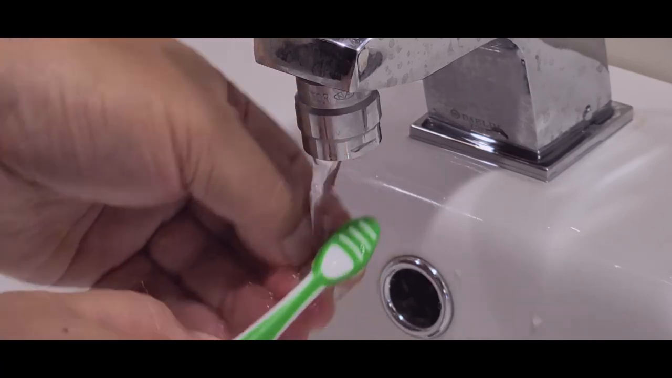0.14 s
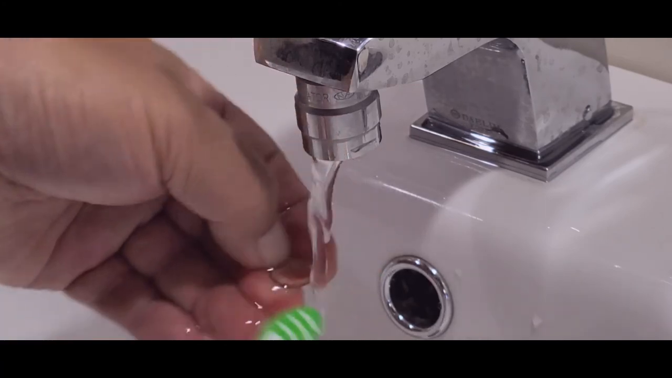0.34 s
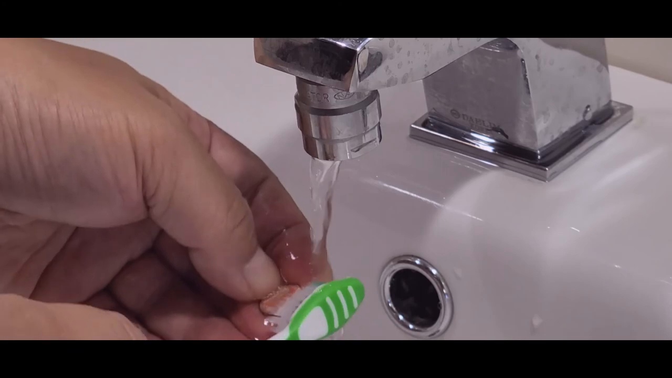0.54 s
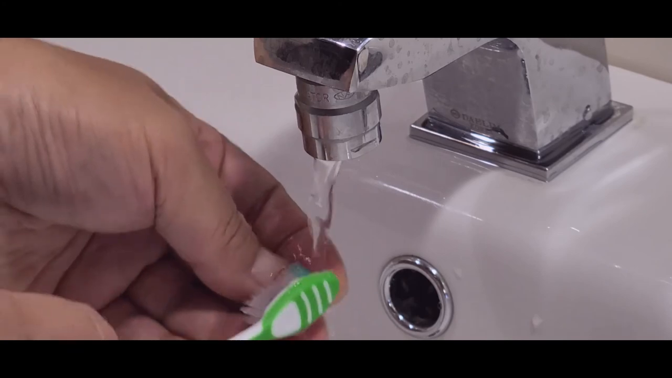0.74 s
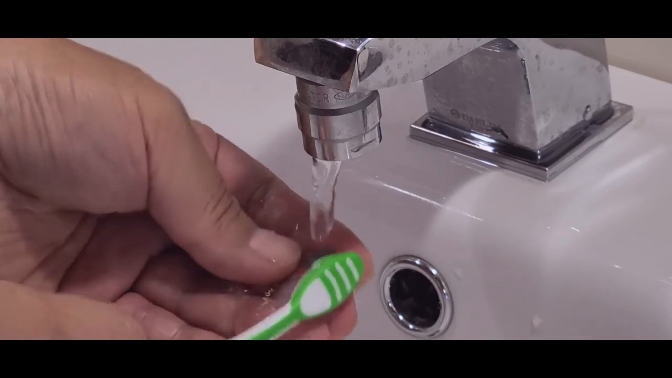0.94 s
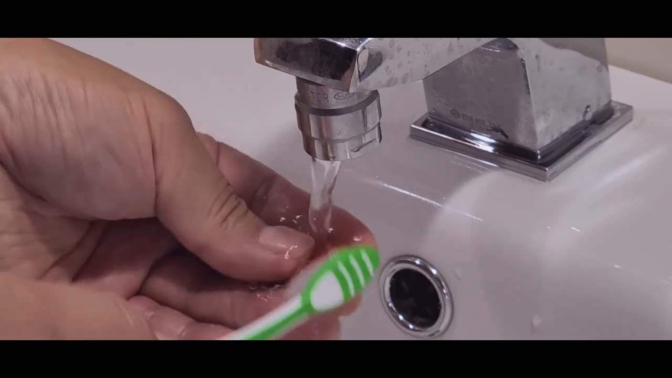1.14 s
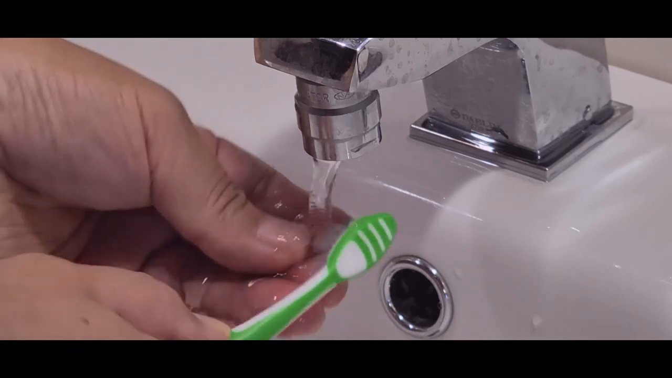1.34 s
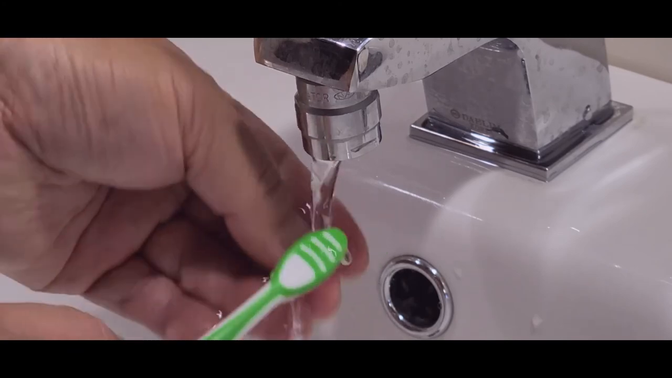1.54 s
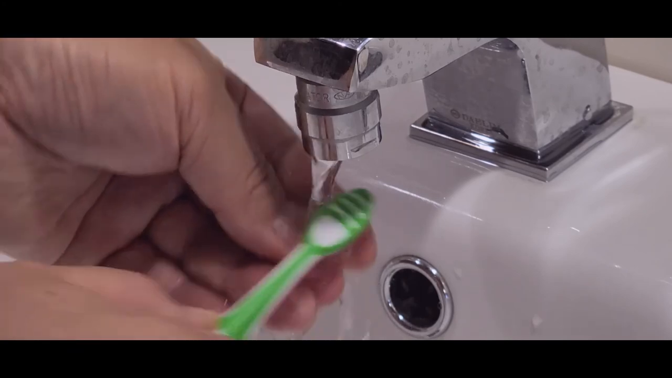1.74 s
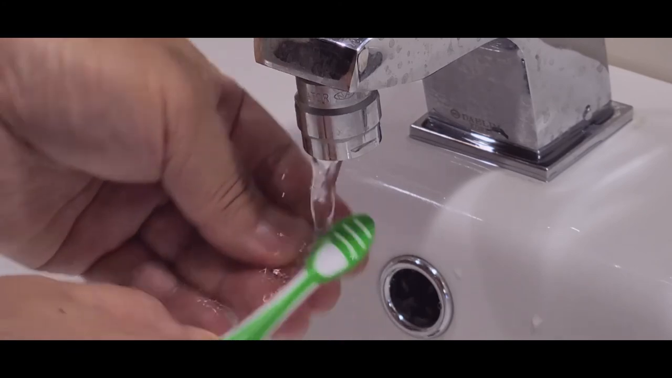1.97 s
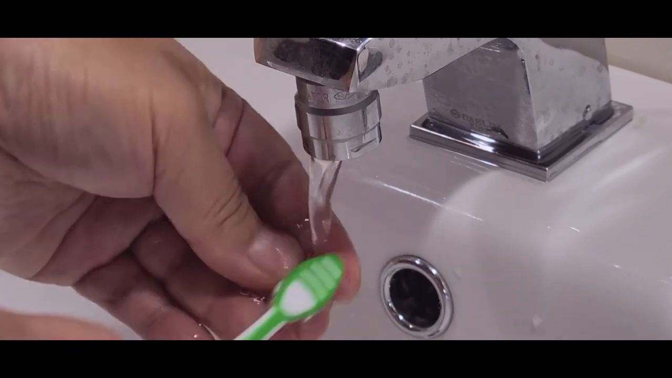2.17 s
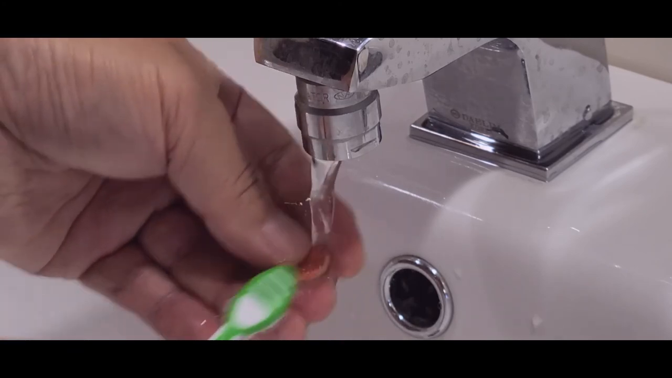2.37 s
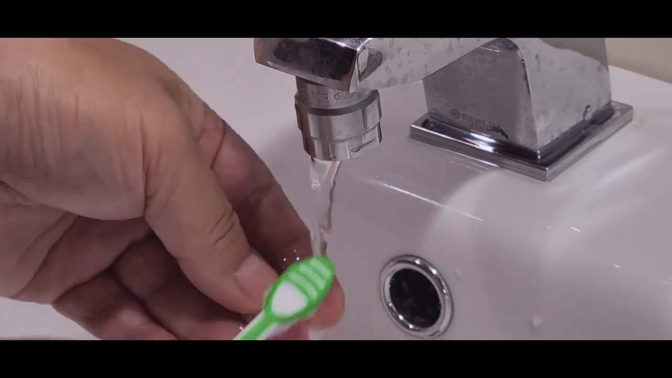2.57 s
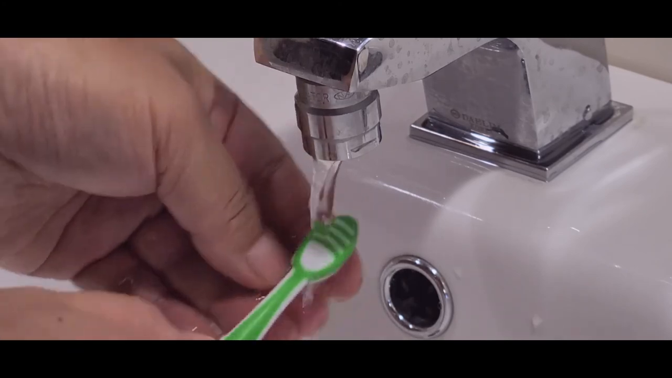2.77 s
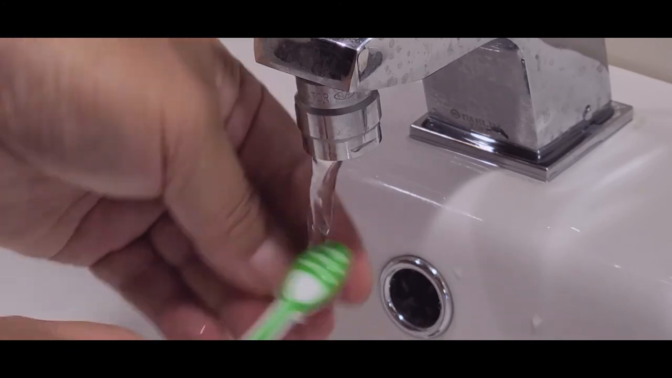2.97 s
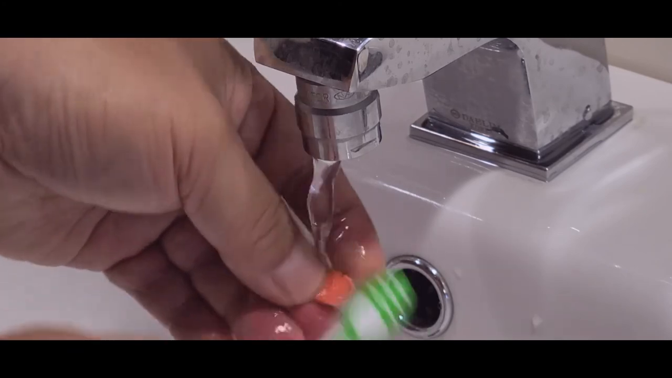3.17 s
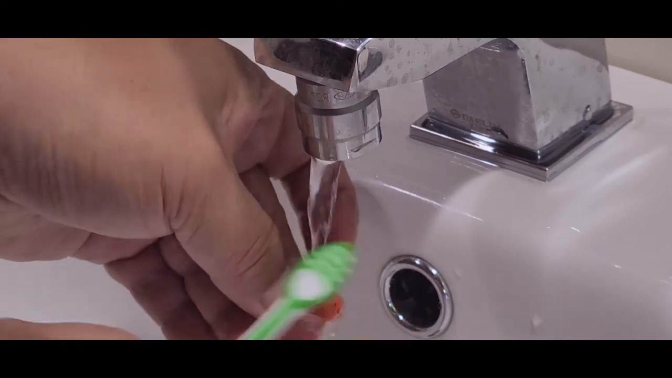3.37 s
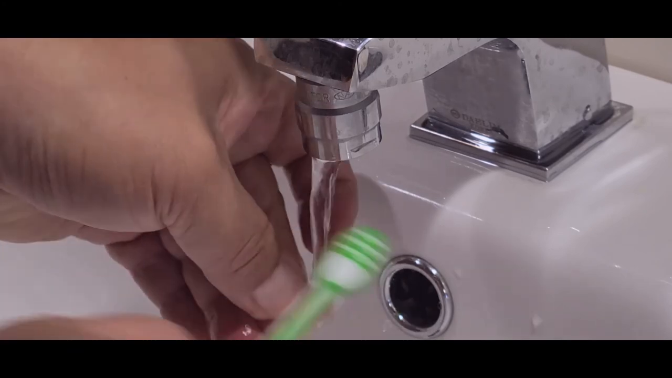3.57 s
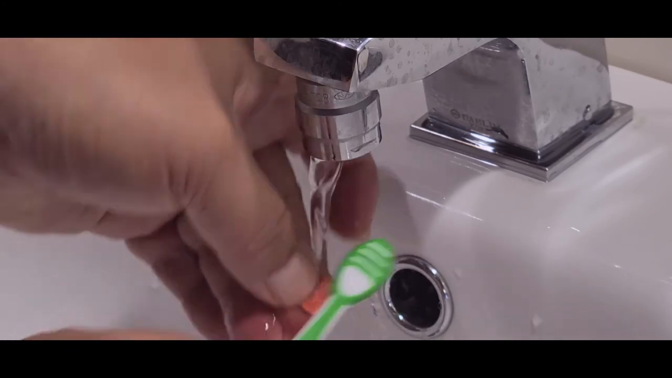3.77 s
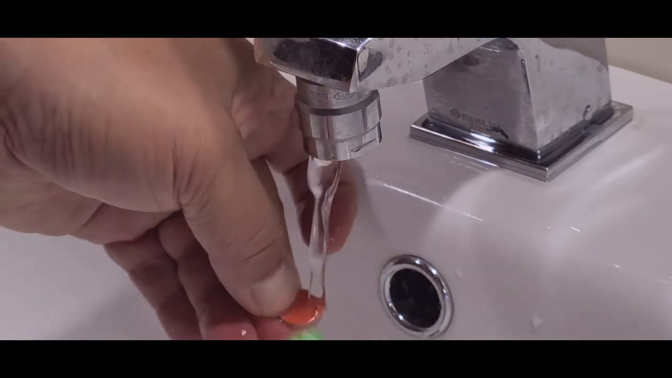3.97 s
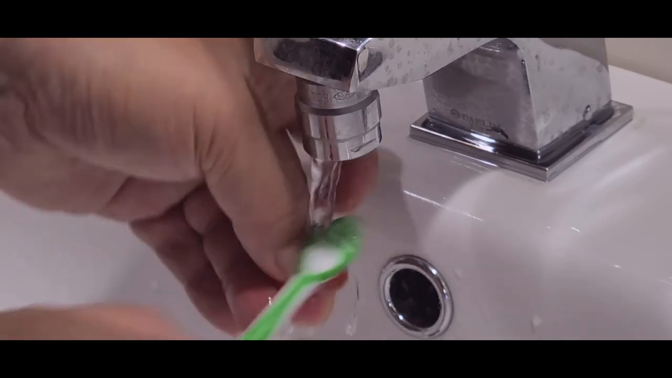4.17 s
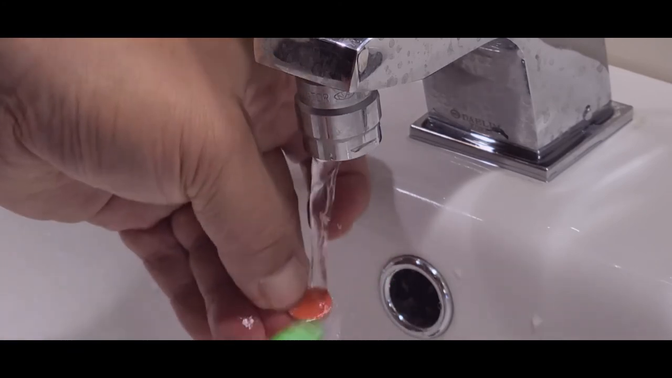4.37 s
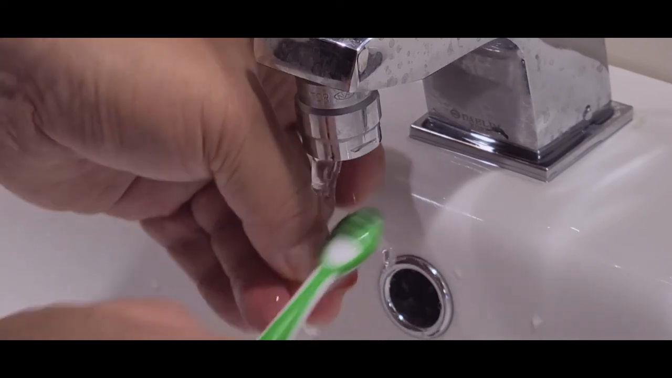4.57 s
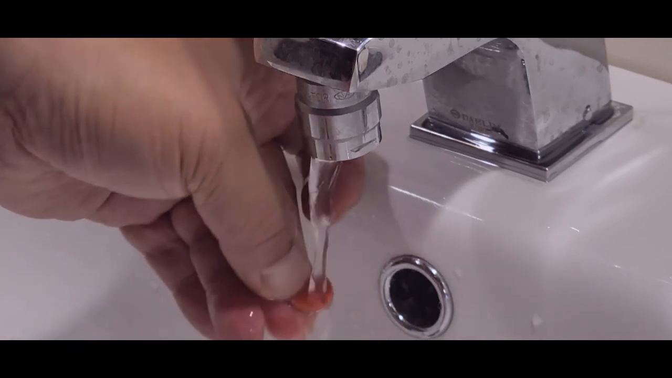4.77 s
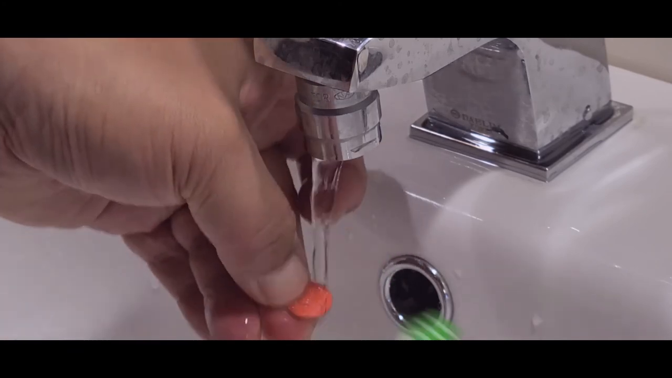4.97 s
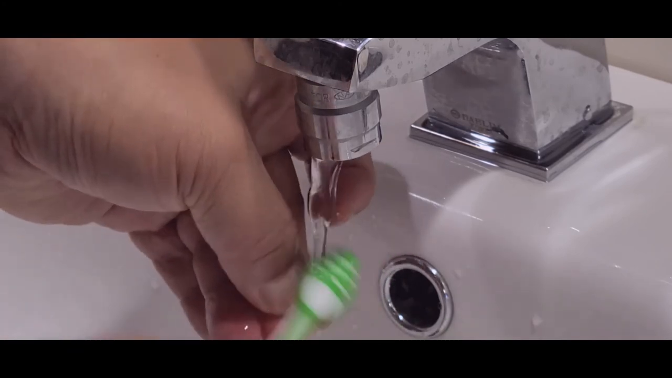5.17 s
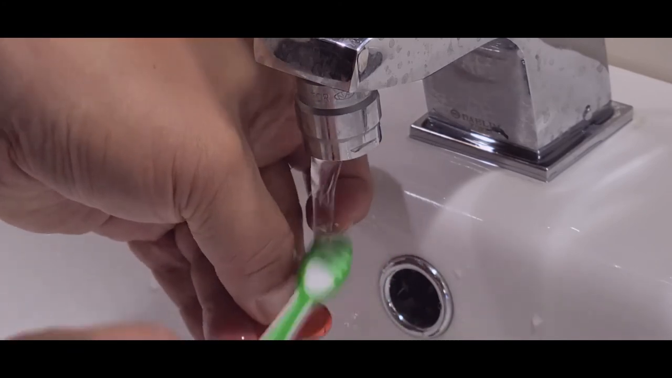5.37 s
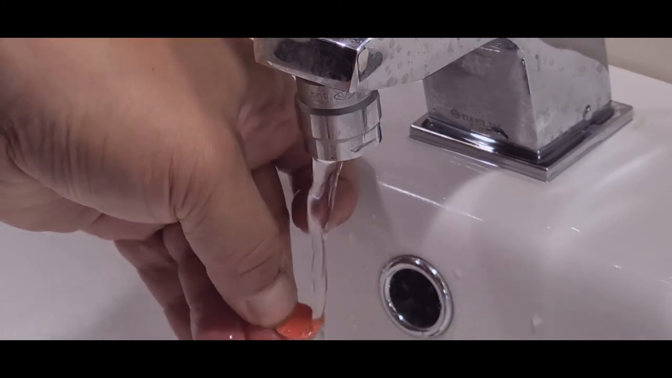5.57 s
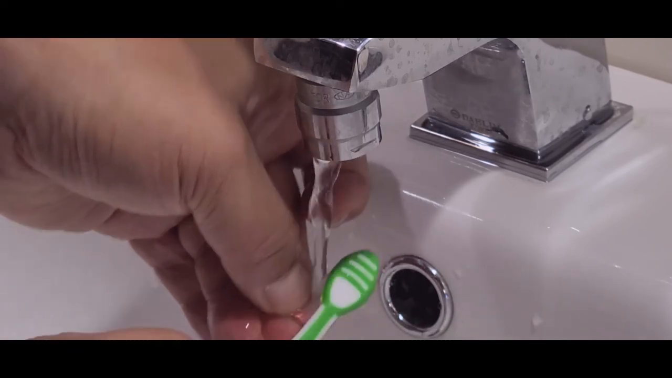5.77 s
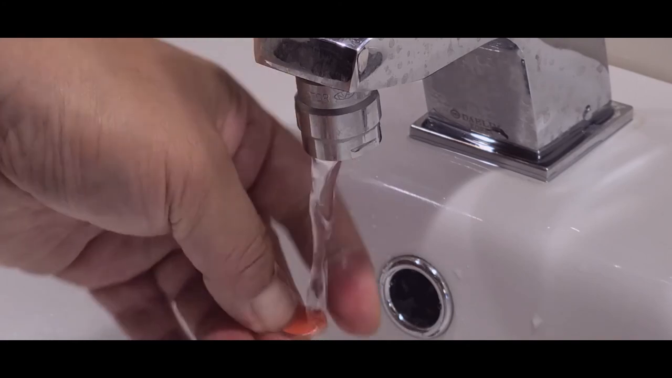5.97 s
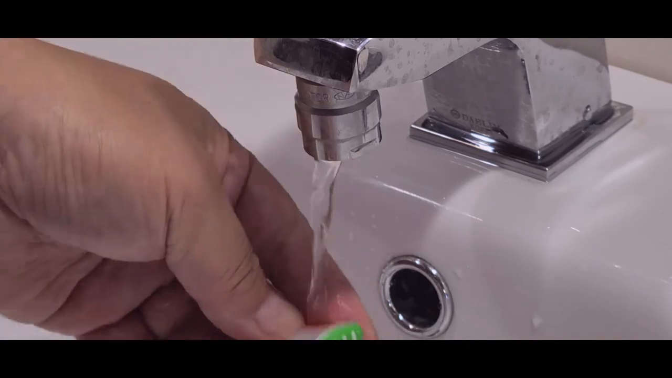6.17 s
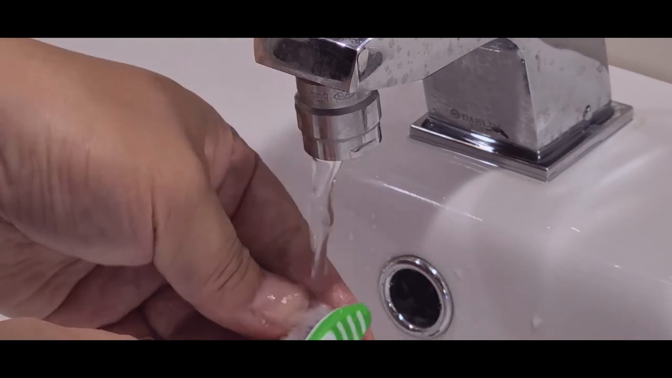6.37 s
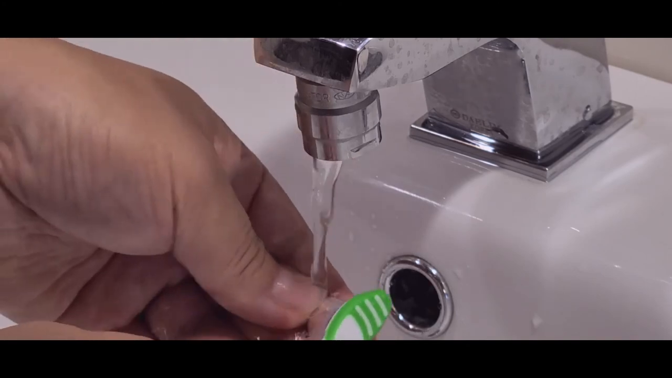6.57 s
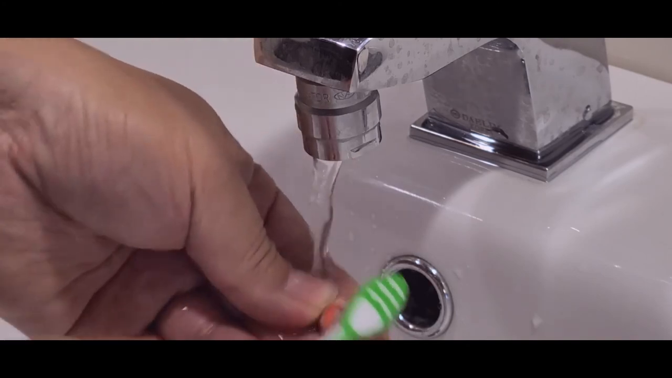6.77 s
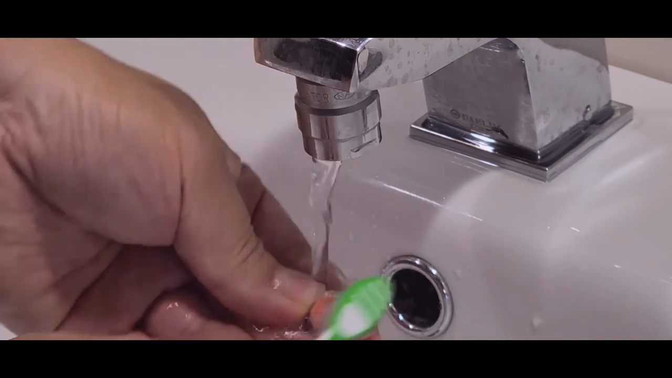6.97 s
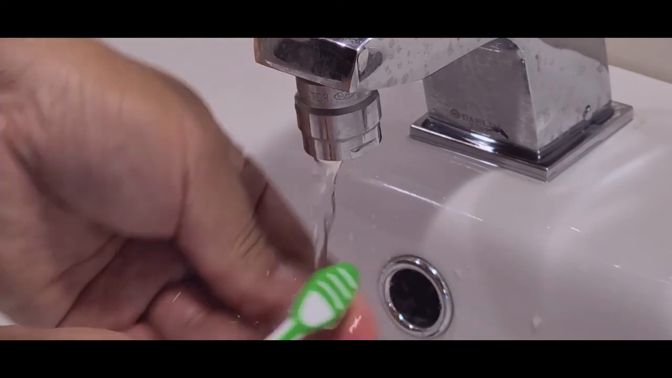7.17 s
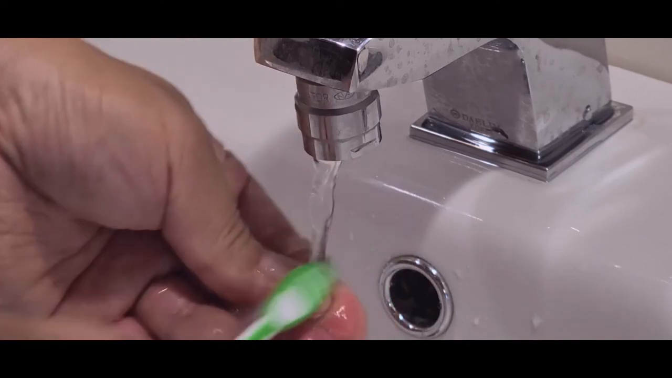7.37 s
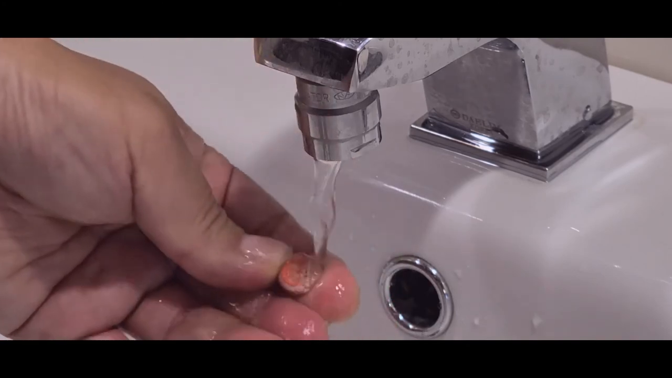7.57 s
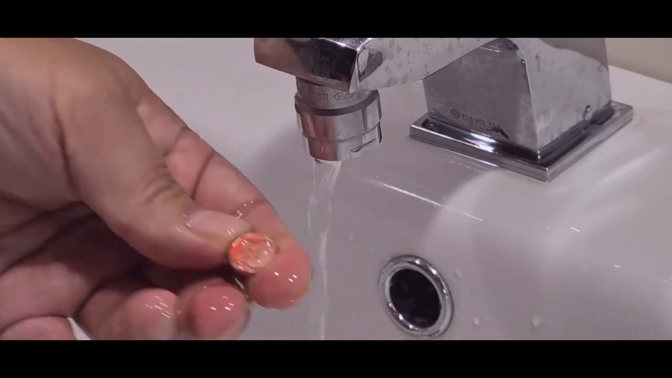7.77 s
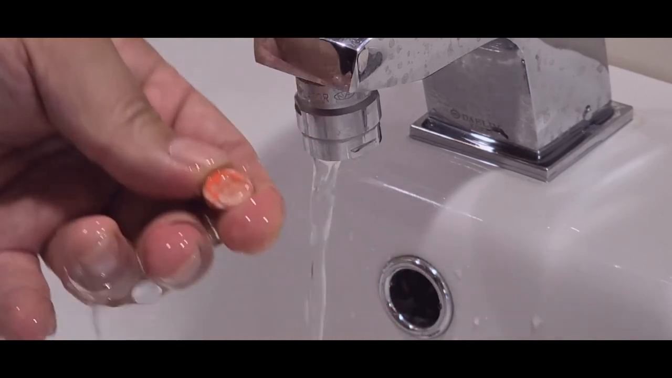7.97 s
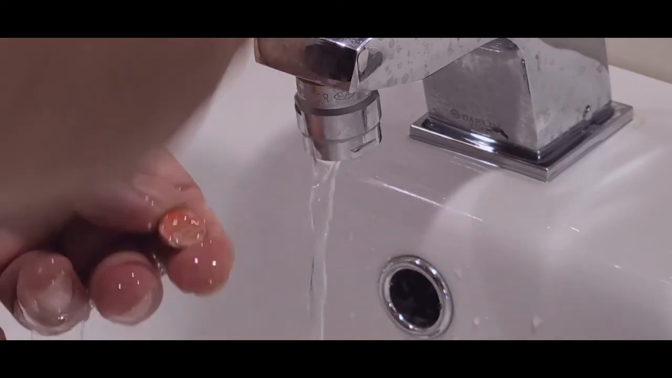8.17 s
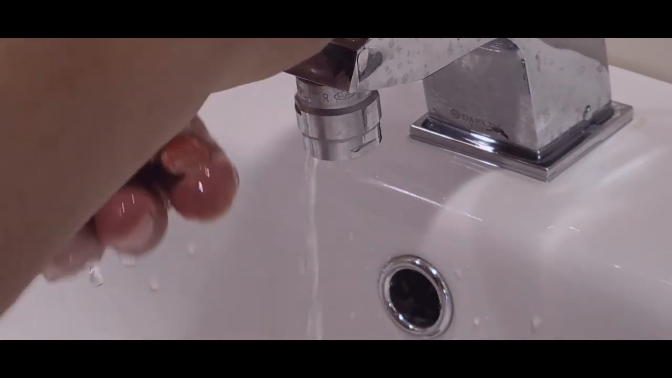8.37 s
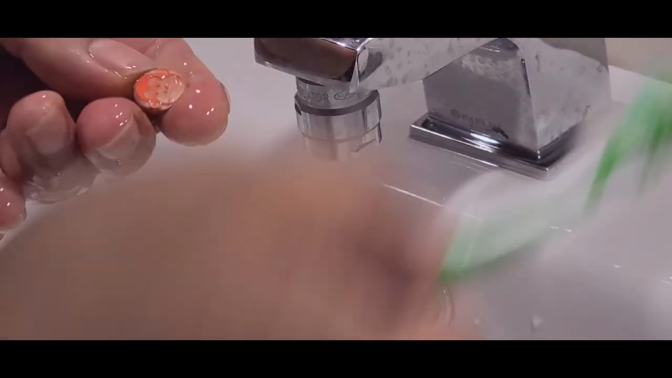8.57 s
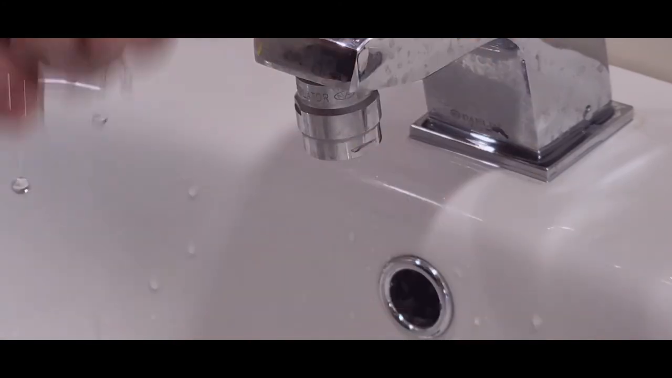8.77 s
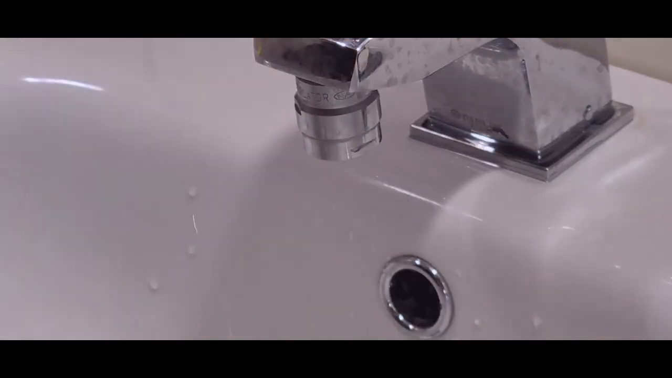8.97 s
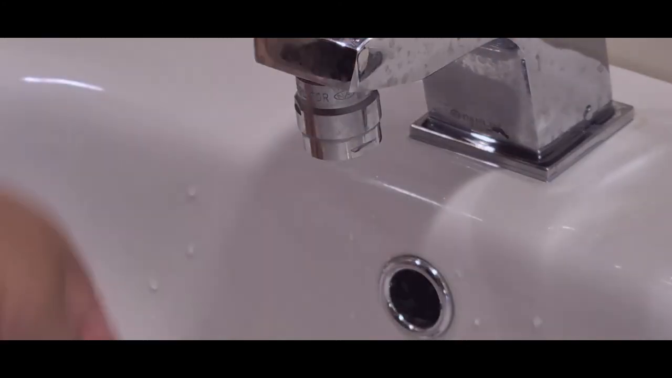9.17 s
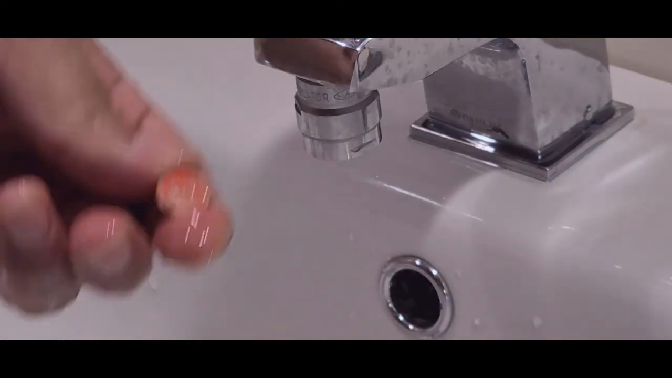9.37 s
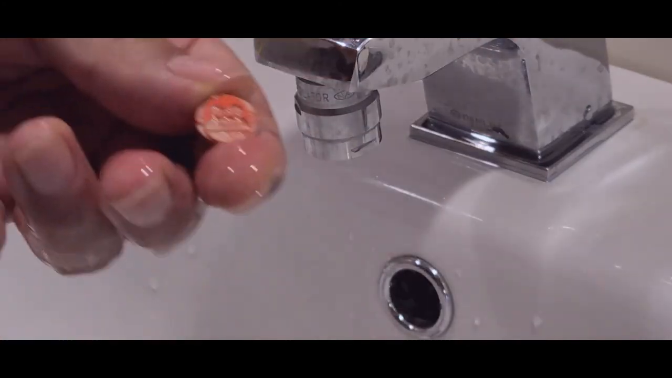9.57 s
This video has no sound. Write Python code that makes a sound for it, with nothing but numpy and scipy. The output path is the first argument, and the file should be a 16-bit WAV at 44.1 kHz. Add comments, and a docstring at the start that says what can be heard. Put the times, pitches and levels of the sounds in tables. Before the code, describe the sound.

Close-up at a bathroom sink: a thin tap stream hisses and trickles over wet fingers into a ceramic basin. A toothbrush scrubs a small object in brief, fizzy bristle strokes, with sharp watery pops and ticking drops. After about eight seconds the lever clacks shut with a dull thump, the water quickly dies away, and only a faint low room rush remains.

```python
"""A toothbrush scrubs a small object under a thin stream from a tap, over a ceramic basin in a small tiled room.
The bristles fizz as bursts of tiny noise snaps; flicked drops tick; air pockets between wet fingers pop as rising rings.
The stream is fluttering noise, water off the fingers is many tiny rings and ticks, and the drain gulps now and then.
The lever is pushed shut with a click and a thump, the water fades and the room's low rush remains."""
import sys
import numpy as np
from scipy import signal
from scipy.fft import rfft, irfft, next_fast_len
from scipy.io import wavfile
from scipy.ndimage import uniform_filter1d

SR = 44100
rng = np.random.default_rng(int(sys.argv[2]) if len(sys.argv) > 2 else 0)


def to_wav(s):
    """Save 16-bit WAV."""
    ch = np.atleast_2d(s).T  # columns
    pcm = np.round(np.clip(ch, -1, 1) * 32767)  # PCM
    wavfile.write(sys.argv[1], SR, pcm.astype(np.int16))


N = 424235
TIME = np.arange(N) / SR

# air pockets popping: start_s, level_db (before the shared gain), pitch_hz, violence (1 is usual, less rings purer)
AIR_POCKETS = [(0.1837, -18, 4830, 0.48), (0.564, -25.5, 6450, 1.07), (1.184, -33, 2880, 0.81),
               (1.374, -16, 5660, 1.15), (1.5423, -7.5, 4500, 1.68), (1.653, -28.5, 6900, 2.5),
               (1.835, -26, 5040, .8), (1.865, -32, 2940, 1.03), (1.9354, -18.5, 4100, 1.12),
               (1.9379, -14.5, 4900, 2.9), (2.258, -38.5, 4700, 0.41), (2.3842, -32.5, 3080, 0.46),
               (2.5749, -17.5, 5900, 0.71), (2.845, -39, 5150, 2.04), (3.340, -22.5, 5580, 1.07),
               (3.351, -26.5, 3970, 0.95), (3.493, -28.5, 5460, 0.55), (3.7291, -21, 4920, 0.43),
               (4.002, -26, 6030, 2.2), (4.01, -34, 4830, 1.9), (5.599, -34.5, 5130, 2.5),
               (5.6327, -21.5, 7140, 0.59), (5.758, -31.5, 5770, 1), (5.9962, -27, 5070, 1.28),
               (6.960, -22.5, 9900, 1.16), (7.086, -28.5, 4000, 2.15), (7.483, -37, 4370, .7),
               (7.535, -23.5, 7250, 1.26), (7.631, -24.5, 5900, 0.77), (7.8587, -24.5, 6150, 1.26),
               (7.954, -26.5, 8760, 0.89), (8.003, -34.5, 3990, 0.53), (8.1019, -25.5, 3100, 1.7),
               (8.1045, -13.5, 5600, 1.2)]
# flicked drops striking the basin: start_s, level_db (before the shared gain)
FLICKED_DROPS = [(0.295, -18), (0.423, -25), (0.4524, -28.5), (0.5356, -27.5), (0.692, -54), (1.9694, -28),
                 (2.063, -24), (2.09, -30.5), (2.3385, -30.5), (2.4196, -35.5), (3.504, -29),
                 (3.8064, -21.5), (3.878, -33), (5.7783, -24.5), (5.854, -21.5), (6.061, -35.5),
                 (7.187, -26), (7.352, -23), (7.8074, -20), (8.0887, -21.5)]
# blows of the closing lever: start_s, click_db, thump_db (before the thump and rattle gains), contact_s
LEVER_BLOWS = [(8.269, -29, -20.5, 0.015), (8.2816, -3.5, -46, 0.0088), (8.301, -15, -22, 0.0058),
               (8.3075, -35, -13, 0.003)]
# tone of a drop's splash: frequency_hz, relative level_db
DROP_TONE = [(1100, -40), (2200, -26.5), (3500, -8), (7000, 3), (12000, 5), (16000, -4.5)]
# strength of the water flow: time_s, level_db
WATER_FLOW = [(0, -2.5), (8.25, -1.1), (8.4, 1), (8.6, -22), (9.62, -41)]


def amp(db):
    """Turns decibels into a gain."""
    return 10 ** (np.asarray(db) / 20)


def unit(x):
    """Scales a sound to an average strength (rms) of 1."""
    return x / np.sqrt(np.mean(x ** 2) + 1e-20)


def read(points, hz):
    """Reads a table between its points, on a log-frequency axis."""
    f, value = np.transpose(points)
    return np.interp(np.log(hz + 1), np.log(f + 1), value)


def level(curve):
    """Turns a decibel curve over time into a gain for every sample."""
    return amp(np.interp(TIME, *np.transpose(curve)))


def add(mix, s, sound):
    """Mixes a sound in at time s, in seconds."""
    part = mix[:, max(round(s * SR), 0):][:, :sound.shape[-1]]
    part += sound[..., :part.shape[1]]


def place(sound, pan_db, lag):
    """Places a sound by a left-right level difference at equal total power and a delay in samples."""
    ratio = amp(np.clip(pan_db, -7, 7))
    left, right = unit(np.array([ratio, 1]))
    return np.array([left * np.roll(sound, max(lag, 0)), right * np.roll(sound, max(-lag, 0))])


def band(x, low_hz, high_hz, order=4):
    """Keeps the range between two frequencies; nothing sounds ahead of its cause."""
    sos = signal.butter(order, [low_hz, min(high_hz, SR / 2 - 1)], "band", fs=SR, output="sos")
    return signal.sosfilt(sos, x)


def colour(x, spectrum, size=2048):
    """Gives a sound the shape of a spectrum, using a filter of energy 1 that never sounds early."""
    hz = abs(np.fft.fftfreq(size, 1 / SR))
    log_gain = np.log(amp(np.maximum(read(spectrum, hz), -100)))
    # this phase packs the energy as early as possible
    taps = np.fft.ifft(np.exp(np.conj(signal.hilbert(log_gain)))).real[:size // 2]
    return signal.oaconvolve(x, taps[None] / np.linalg.norm(taps), axes=1)[:, :x.shape[1]]


def diffuse(gain):
    """Makes steady noise of spectrum gain(Hz), nearly the same left and right in the bass."""
    # left-right likeness: frequency_hz, likeness (0-1)
    likeness = [(80, 0.87), (300, 0.71), (700, 0.32), (2000, 0)]
    size = next_fast_len(N)
    hz = np.fft.rfftfreq(size, 1 / SR)
    a, b = rfft(rng.standard_normal((2, size)))
    alike = np.clip(read(likeness, hz), 0, 1)
    sides = np.array([a, alike * a + np.sqrt(1 - alike ** 2) * b])
    return unit(irfft(sides * gain(hz), size)[:, :N])


def room(x, wet_db, early_db, count=8):
    """Adds a few quick reflections off the basin and the fading tail of the tiled room to the direct sound."""
    # time for the tail to fall by 60 dB: frequency_hz, fade_s
    room_fade = [(200, 0.27), (1400, 0.32), (4000, 0.23), (9000, 0.2), (15000, 0.2)]
    taps = rng.choice([-1., 1.], (2, SR // 2)) * (rng.random((2, SR // 2)) < .15)  # sparse echoes
    taps *= np.clip(TIME[:SR // 2] / 0.0028 - .5, 0, 1)  # the tail starts just after the direct sound
    hz, t, z = signal.stft(taps, SR, nperseg=256)
    fade = amp(-60 * t / read(room_fade, hz)[:, None])
    tail = signal.istft(z * fade, SR, nperseg=256)[1]
    response = amp(wet_db) * tail / np.linalg.norm(tail[0])
    for side in response:
        delays = (rng.uniform(.0012, .014, count) * SR).astype(int)
        side[delays] += amp(early_db) * rng.choice([-1, 1], count) / np.sqrt(count)
    response[:, 0] += 1  # direct sound
    return signal.oaconvolve(x, response, axes=1)[:, :N]


def bubble(hz, sweep_hz, swell_s, onset=1.9):
    """A pocket of air swells into a ring and fades; its pitch climbs by the sweep as it nears the surface."""
    u = np.arange(0, 18, 1 / (swell_s * SR))  # time in swells
    pitch = hz + sweep_hz * np.tanh((u - 1.15) * 0.59)
    swell = (u * np.exp(1 - u)) ** onset
    return swell * np.sin(2 * np.pi * (np.cumsum(pitch) / SR + rng.random()))


def splat(decay_s):
    """A tiny impact: a 4 ms burst of fading noise, rms 1."""
    t = TIME[:176]
    return unit(rng.standard_normal(len(t)) * np.exp(-t / decay_s))


def air(air_db=-58):
    """The room's low rush: steady noise, strongest in the bass."""
    # tone of the rush: frequency_hz, relative level_db
    air_tone = [(45, -10), (75, 1), (95, -7.5), (118, -23), (150, -11), (195, -17), (330, -12),
                (500, -19.5), (900, -20), (2200, -28), (5600, -35.5), (7000, -28.5), (8600, -40.5),
                (16000, -38.5)]
    return amp(air_db) * diffuse(lambda hz: amp(read(air_tone, hz)))


def rumble(s=4.94, db=-54, hz=27, width_hz=14, decay_s=0.48):
    """A soft, very low shudder: noise around one deep pitch that dies away."""
    since = np.maximum(TIME - s, 0)
    swell = np.minimum(since / .01, 1) * np.exp(-since / decay_s)
    return amp(db) * swell * diffuse(lambda f: 1 / (1 + ((f - hz) / width_hz) ** 2))


def drain(gain_db=-2, swell_s=0.011, rough=0.68, gurgle_db=-63, gurgle_hz=432, spread_hz=32, count=60):
    """Large, wobbling bubbles gulp in the waste pipe; fainter ones gurgle at random until the lever closes."""
    # the largest bubbles: start_s, level_db (before the shared gain), pitch_hz
    gulps = [(1.387, -52.5, 430), (1.839, -48, 432), (3.129, -53.5, 404.4), (8.053, -51, 438),
             (8.525, -48.5, 417)]
    out = np.zeros((2, N))
    gurgles = [(rng.uniform(0, LEVER_BLOWS[0][0]), gurgle_db, gurgle_hz + spread_hz * rng.standard_normal())
               for _ in range(count)]
    for s, db, hz in gulps + gurgles:
        add(out, s, amp(db + gain_db) * bubble(hz, 4.9, swell_s, onset=0.22))
    return out * (1 + rough * unit(uniform_filter1d(rng.standard_normal(N), 250)))


def hammer(s=8.298, db=-29.5, hz=91, swell_s=0.039):
    """The halted water shakes the supply pipe, which booms at one low pitch."""
    out = np.zeros((2, N))
    add(out, s, amp(db) * bubble(hz, 0, swell_s, onset=1.2))
    return out


def lever(thump_db=-9, rattle_db=-20, rattle_s=0.0084, chatter_db=4):
    """The lever clicks against its stop; the blow rings the basin and counter and sets the fitting rattling."""
    # ringing tones of basin and counter: pitch_hz, relative level_db, fade_s (time to fall by 60 dB)
    basin_tones = [(227, -6.5, 0.23), (268, -1, 0.26), (286.8, 3, 0.16), (335, 6, 0.1), (359, 4, 0.14),
                   (390, 1, 0.16), (430, -8.5, 0.31), (491.6, -8, 0.25), (730, -25, 0.22), (868, -23, 0.35),
                   (916, -27, 0.29), (1077, -21, 0.17), (1317, -17.5, 0.21)]
    # tone of the metal click: frequency_hz, relative level_db
    click_tone = [(400, -18), (1200, -10), (1900, -8), (2600, -2), (3350, 6), (4100, -6), (5500, -16.5),
                  (16000, -24)]
    clicks, thumps, shake = np.zeros((2, N)), np.zeros((2, N)), np.zeros((1, N))
    t = TIME[:SR]
    ring = sum(amp(db - 60 * t / fade_s) * np.sin(2 * np.pi * hz * t) for hz, db, fade_s in basin_tones)
    for s, click_db, blow_db, contact_s in LEVER_BLOWS:
        add(clicks, s, amp([click_db]))
        softened = ring * (1 - np.exp(-t / contact_s))  # longer contact, slower start
        add(thumps, s, amp(blow_db + thump_db) * softened)
        add(shake, s, amp(blow_db + rattle_db) * np.exp(-t / rattle_s))
    chatter = amp(chatter_db * unit(uniform_filter1d(rng.standard_normal(N), 200)))
    rattle = shake * unit(chatter) * diffuse(lambda hz: 1 / (1 + ((hz - 1100) / 400) ** 2))
    body = band(thumps + rattle, 193, 2500, order=6)  # the stiff basin radiates no deep bass
    metal = room(colour(clicks, click_tone), wet_db=-2, early_db=-3)
    return metal + room(body, wet_db=-5.5, early_db=-27)


def stream(hiss_db=-57, flutter_db=2.5):
    """The running tap: a fluttering noise hiss and the hollow resonances of pipe and spout."""
    # tone of the hiss: frequency_hz, relative level_db
    hiss_tone = [(150, -1.5), (400, -8.5), (1000, 2), (1600, 0.5), (2200, -15.5), (3200, -2), (5000, 0),
                 (7500, -3.5), (8800, -31.5), (10800, -3.5), (12000, 4), (16000, -5.5)]
    # resonances that the flow excites: pitch_hz, width_hz, level_db (before the flow)
    pipe_tones = [(446, 16, -70), (790, 140, -69), (1341, 15, -68), (1808, 40, -73)]
    flutter = unit(uniform_filter1d(uniform_filter1d(rng.standard_normal(N), 500), 300))
    hiss = amp(hiss_db + flutter_db * flutter) * diffuse(lambda hz: amp(read(hiss_tone, hz)))
    pipe = sum(amp(db) * diffuse(lambda hz: 1 / (1 + ((hz - f) / width) ** 2)) for f, width, db in pipe_tones)
    return (hiss + pipe) * level(WATER_FLOW)


def splashing(calm_db=-8, stirred_db=8, stir_s=0.026, settle_s=0.039):
    """Splashing swells around each pop or flicked drop, then calms; it fades away with the flow."""
    t = TIME[::256]
    since = np.array([t - row[0] for row in AIR_POCKETS + FLICKED_DROPS])
    # builds up before each event, settles after it
    stir = np.exp(np.minimum(since / stir_s, -since / settle_s)).max(axis=0)
    return level(np.c_[t, calm_db + (stirred_db - calm_db) * stir]) * level(WATER_FLOW)


def trickle(bubbles_db=-65.0, spatter_db=-60.0, bubbles_per_s=300, spatter_per_s=500, spread_db=10.0, count=36):
    """Water running off the fingers: tiny ringing bubbles and noisy spatter, mostly small and a few large."""
    size = amp(spread_db * np.minimum(rng.exponential(1, N), 2.5))
    born = rng.random(N) < bubbles_per_s / SR
    kind = rng.integers(0, count, N)
    bubbles = np.zeros((2, N))
    for k, hz in enumerate(np.linspace(4200, 9000, count)):
        ring = bubble(hz, 0.04 * hz, rng.uniform(0.0001, 0.00241))
        ring = place(ring, rng.normal(0, 2.3), rng.integers(-5, 6))
        for i in np.flatnonzero(born & (kind == k)):
            add(bubbles, i / SR, size[i] * ring)
    hits = size * (rng.random(N) < spatter_per_s / SR)
    spatter = colour(hits * rng.standard_normal((2, N)), DROP_TONE)
    return (amp(bubbles_db) * unit(bubbles) + amp(spatter_db) * unit(spatter)) * splashing()


def drops(gain_db=-9):
    """Drops flung off the brush and fingers tick on the ceramic as tiny bursts of noise."""
    out = np.zeros((2, N))
    for s, db in FLICKED_DROPS:
        add(out, s, amp(db + gain_db) * place(splat(decay_s=0.0012), 0, rng.integers(-3, 4)))
    return colour(out, DROP_TONE)


def pops(gain_db=-7.5, crack_db=-10, snap_db=-17, swell_s=.0008, sweep=0.24, pan_db=1.0, wet_db=-6, early_db=-7,
         nearness=0.21):
    """Air pockets burst between wet fingers: mild ones ring pure, violent ones sweep far, crack and die sooner.
    Each has its own reflections, and the loud ones are nearer and drier."""
    out = np.zeros((2, N))
    for s, db, hz, violence in AIR_POCKETS:
        violence = max(violence, .1)
        swell = swell_s / violence ** .5
        ring = bubble(hz * (1 - sweep * violence / 4), sweep * violence * hz, swell)
        lag, side_db = rng.integers(-2, 3), rng.normal(pan_db, 2.3)
        burst = place(np.sqrt(2) * ring, side_db, lag)
        # noise in a wide band around the pitch
        crack = min(violence, 1) * unit(band(splat(decay_s=0.00038), 0.67 * hz, 1.45 * hz, order=3))
        add(burst, swell / 2, amp(crack_db) * place(crack, side_db, -lag))
        snap = colour(place(splat(decay_s=0.0016), 0, lag), DROP_TONE)  # the water film snaps
        add(burst, swell / 2, min(violence, 1) ** 2 * amp(snap_db) * snap)
        burst *= np.sqrt(0.0039 * SR / np.sum(burst ** 2))  # equal energy, however long the ring
        add(out, s, amp(db + gain_db) * room(burst, wet_db - nearness * db, early_db))
    return out


def brush(snaps_per_s=4000, clump_db=4.0, hollow_db=3.5, alike=0.48, beads_db=-6, wet_db=-1, early_db=-5,
          size=50, count=6):
    """Bristles snap free in tufts and burst beads of water; the hollow of the fingers reshapes each stroke's tone."""
    # brush strokes: start_s, length_s, level_db, hardest_push (place in the stroke, 0-1), tilt_db (per octave)
    strokes = [(0.214, 0.086, -32.5, 0.72, -0.2), (0.626, 0.03, -46.5, .5, 1),
               (1.217, 0.016, -45.5, 0.65, -2), (1.758, 0.034, -40.5, 0.47, .5),
               (2.023, 0.06, -42, 0.3, -1.5), (2.338, 0.029, -46, 0.4, 3), (2.567, 0.015, -37, 0.3, 3.5),
               (2.886, 0.011, -41.5, .3, -0.5), (3.166, 0.027, -35.5, 0.48, -2.8),
               (3.444, 0.046, -34, 0.07, 1.5), (3.628, 0.14, -40.5, 0.21, 0), (3.798, 0.082, -34, 0.43, 3),
               (4.047, 0.11, -46, 0.24, 1.5), (4.174, 0.069, -33.5, 1, 1), (4.442, 0.075, -43.5, 0.52, 1),
               (4.588, 0.078, -31.5, 0.64, 1.2), (4.915, 0.045, -34, 0.7, 0.1),
               (5.184, 0.042, -33, 0.62, 0.5), (5.427, 0.06, -32.5, 0.9, 1.3),
               (5.701, 0.05, -35.5, 0.41, 3), (5.839, 0.096, -32.5, 0.44, 2), (6.805, 0.2, -50, 0.4, -3.5),
               (6.957, 0.024, -37.5, 0.65, 0.5), (7.079, 0.052, -36, 0.33, -1.5),
               (7.198, 0.063, -37, 0.02, -1), (7.323, 0.15, -32.5, 0.38, -0.1)]
    # tone of the bristles: frequency_hz, relative level_db
    bristle_tone = [(500, -27.5), (1150, -6.5), (1700, -10.5), (2300, -8.5), (3000, 0), (4200, -1.5),
                    (5500, 4.5), (8000, 6.5), (13000, 5.5), (16000, 0)]
    tufts = amp(clump_db * unit(uniform_filter1d(rng.standard_normal(N), 110)))
    snaps = rng.standard_normal((3, N)) * (rng.random((3, N)) < snaps_per_s / SR)
    snaps = (snaps[:2] + alike * snaps[2]) * tufts  # left and right share some snaps
    out, hz = np.zeros((2, N)), np.geomspace(500, 16000, size)
    for s, length, db, crest, tilt_db in strokes:
        u = np.linspace(0, 1, max(round(length * SR), 2))  # progress through the stroke
        push = np.interp(u, [0, np.clip(crest, .05, .95), 1], [0, np.pi / 2, np.pi])
        force = np.sin(push).clip(0) ** 1.44
        scrape = unit(force * snaps[:, round(s * SR):][:, :len(u)]) * np.sqrt(np.mean(force ** 2))
        tone = read(bristle_tone, hz) + tilt_db * np.log2(hz / hz.mean())
        shapes = rng.standard_normal((2, size))
        first, last = (colour(scrape, np.c_[hz, tone + hollow_db * shape]) for shape in shapes)
        stroke = (1 - u) * first + u * last
        for at, pitch, strength in rng.random((count, 3)):
            bead_hz = 4200 * 2.3 ** pitch
            bead_gain = amp(beads_db) * 2 * strength * np.interp(at, u, force)
            add(stroke, at * length, bead_gain * bubble(bead_hz, 0.15 * bead_hz, 0.0012))
        add(out, s, amp(db) * room(stroke, wet_db, early_db))
    return out


def scene():
    """Water and brush close by, in the room, over its steady low rush."""
    background = air() + rumble()
    splashes = room(drops() + drain(), wet_db=-6.5, early_db=-4.0)
    runoff = room(trickle(), wet_db=1.0, early_db=-0.5)
    return background + splashes + hammer() + lever() + stream() + runoff + pops() + brush()


def record(dry, edge_hz=16100):
    """Removes the sound above the edge frequency with a steep low-pass filter."""
    taps = signal.firwin(511, edge_hz, window=("kaiser", 9), fs=SR)
    return signal.oaconvolve(dry, taps[None], "same")


dry = scene()
out = record(dry)
to_wav(out)
```